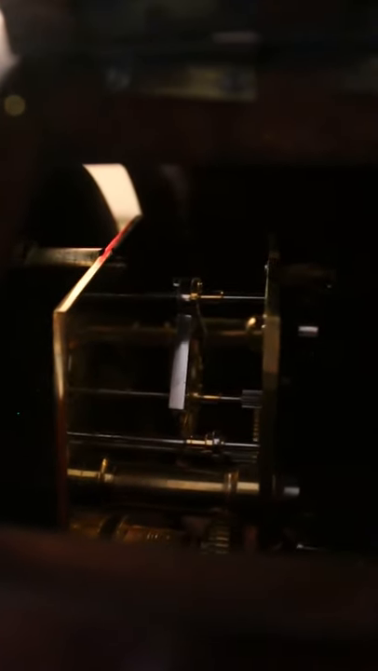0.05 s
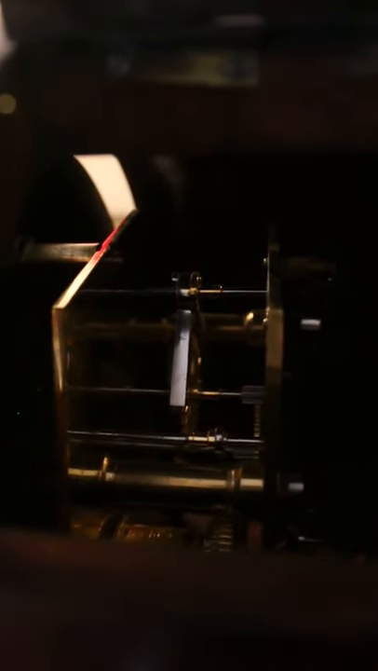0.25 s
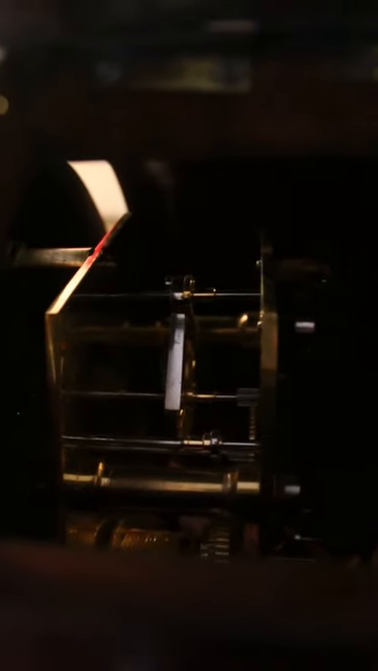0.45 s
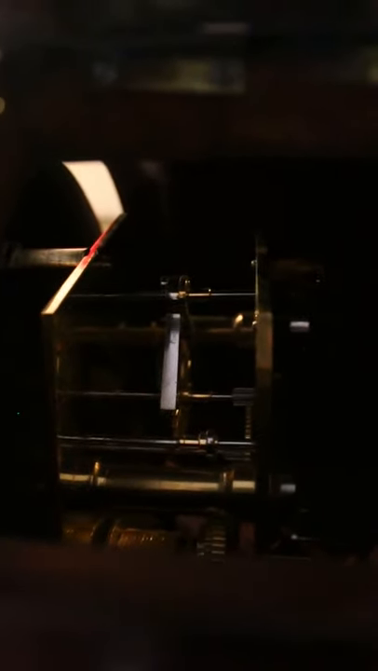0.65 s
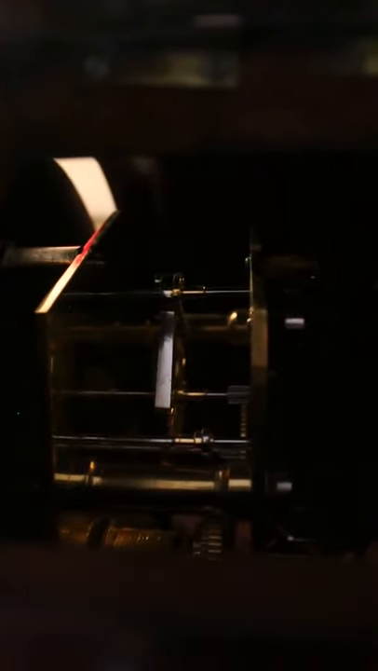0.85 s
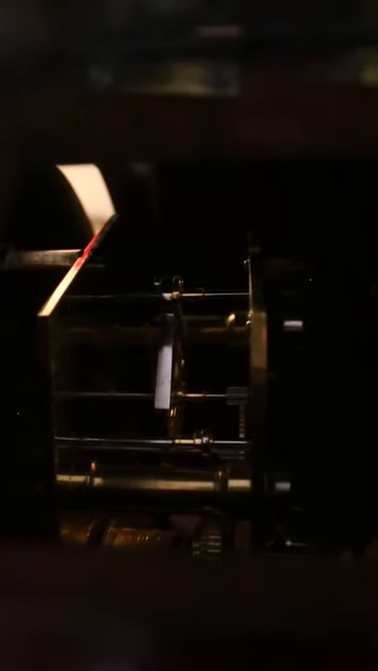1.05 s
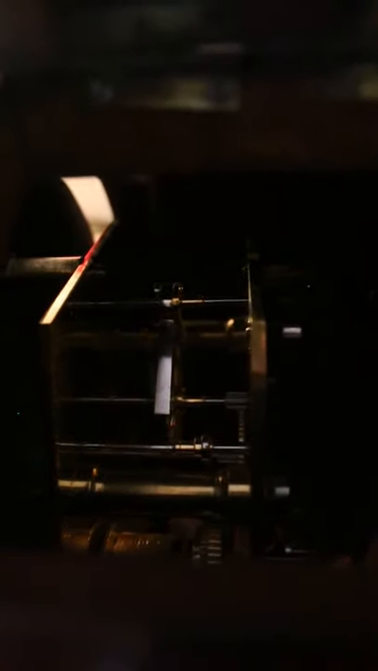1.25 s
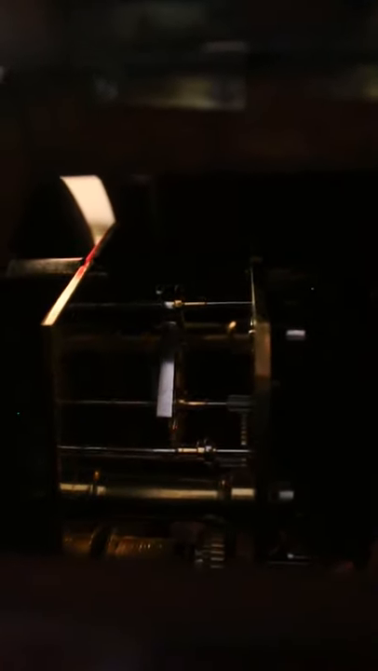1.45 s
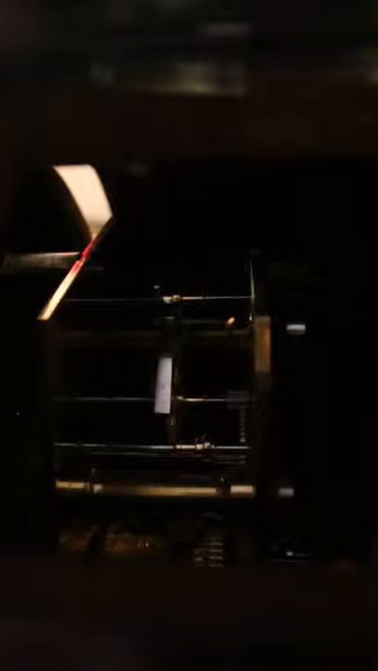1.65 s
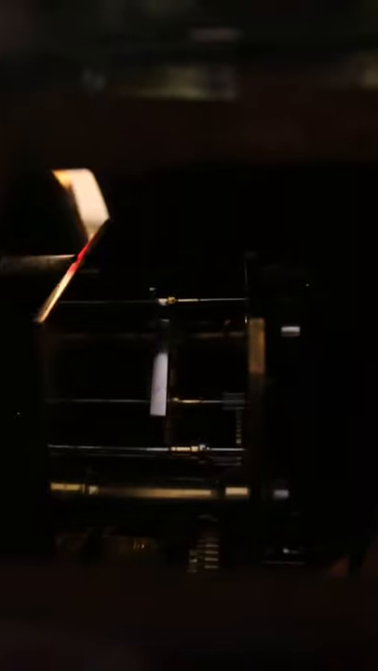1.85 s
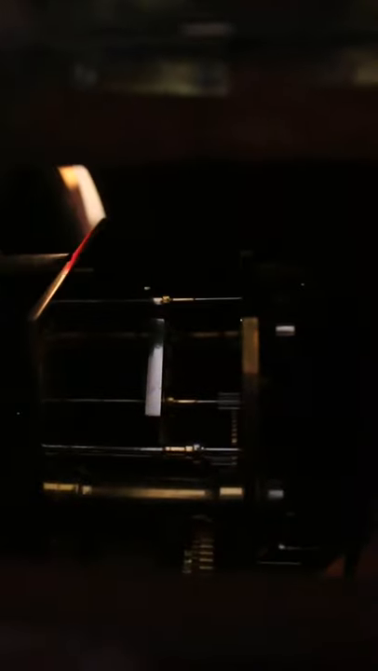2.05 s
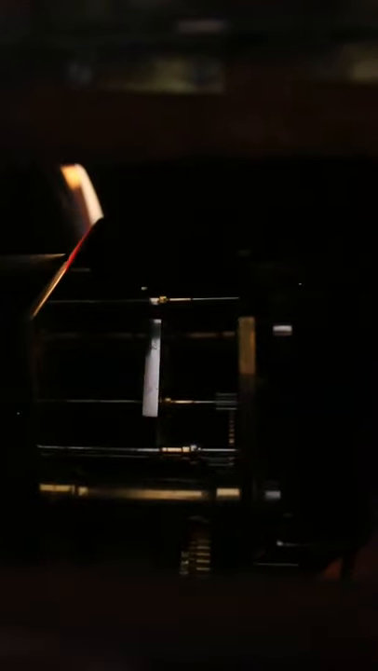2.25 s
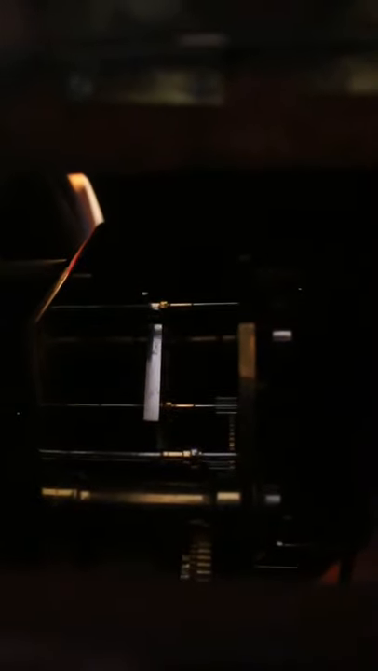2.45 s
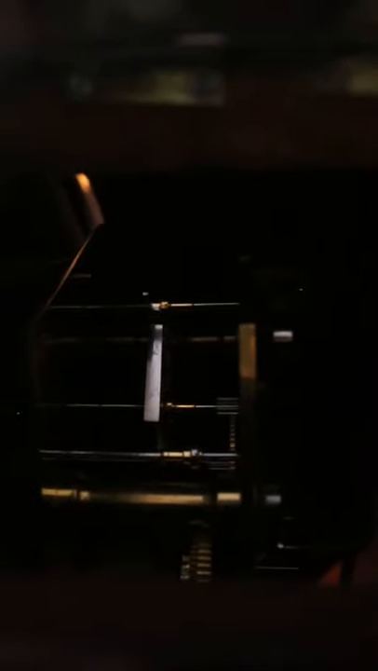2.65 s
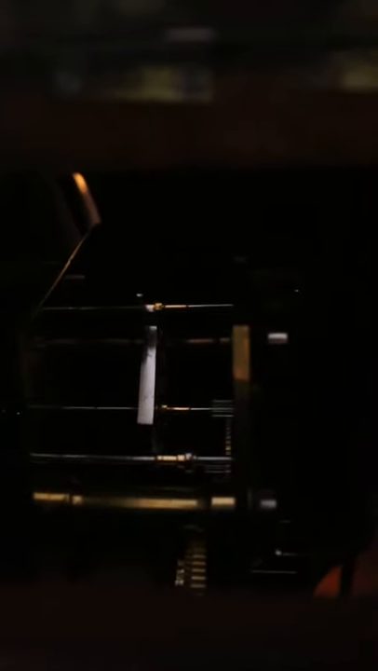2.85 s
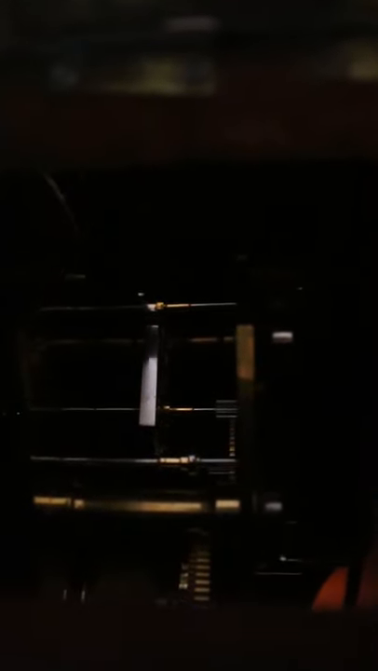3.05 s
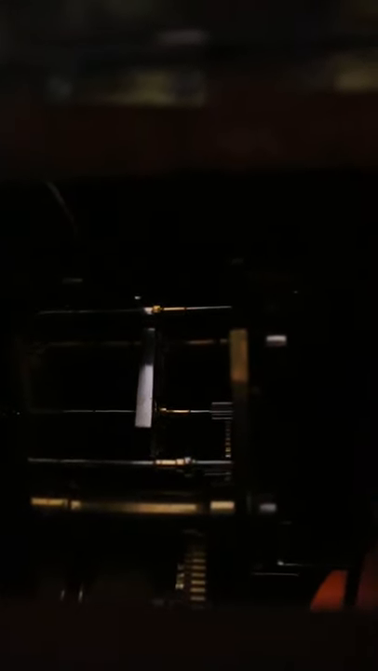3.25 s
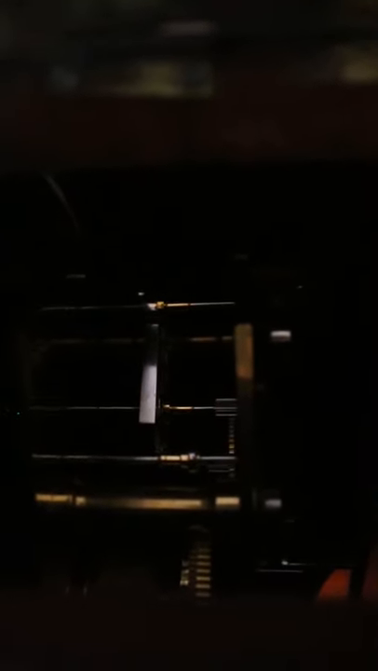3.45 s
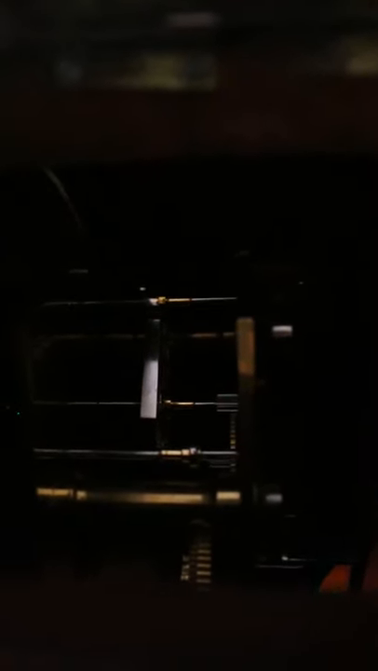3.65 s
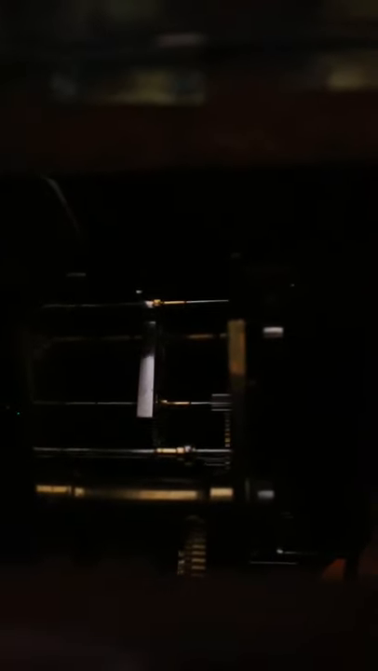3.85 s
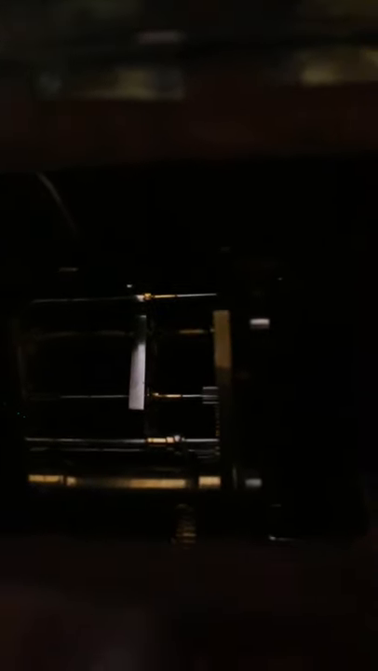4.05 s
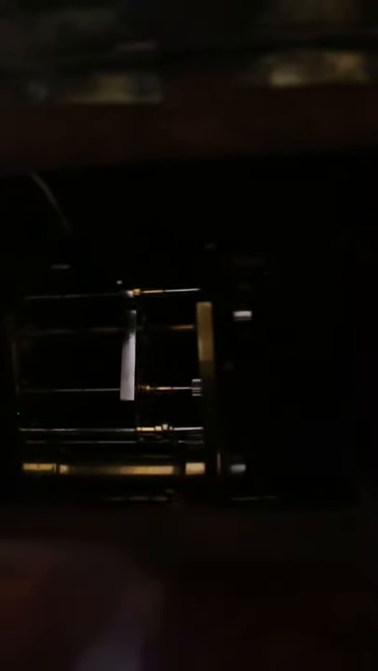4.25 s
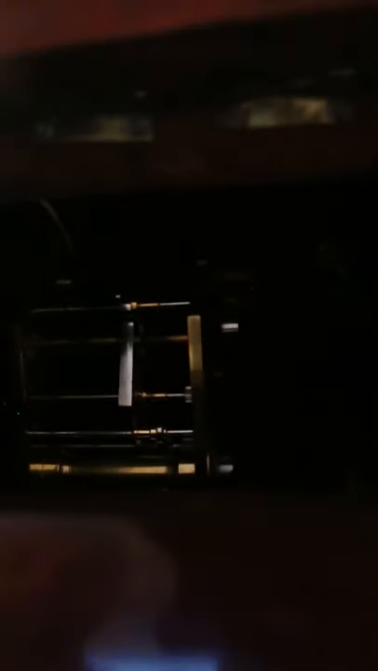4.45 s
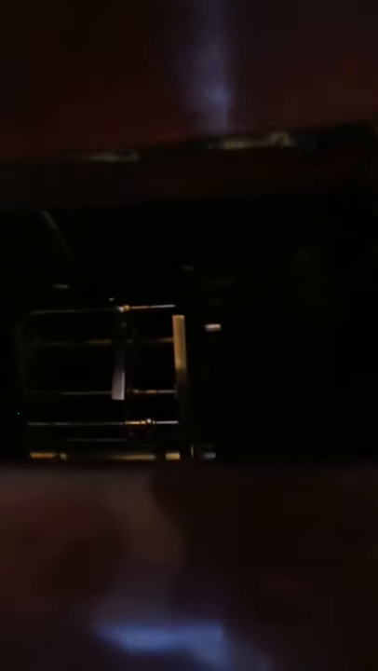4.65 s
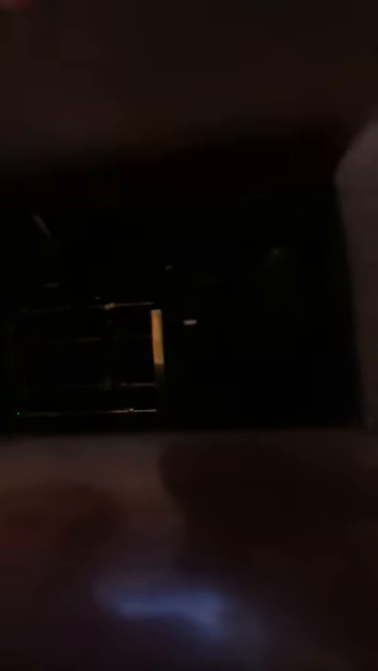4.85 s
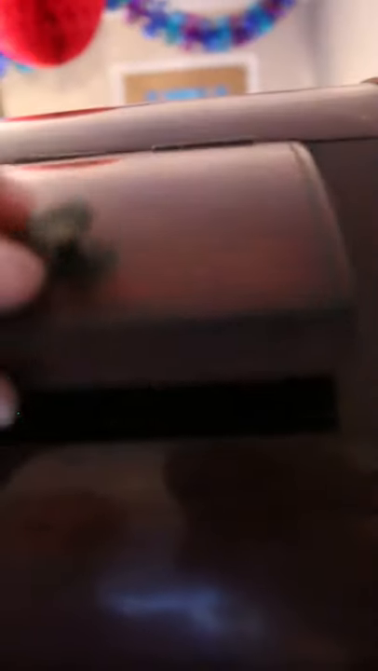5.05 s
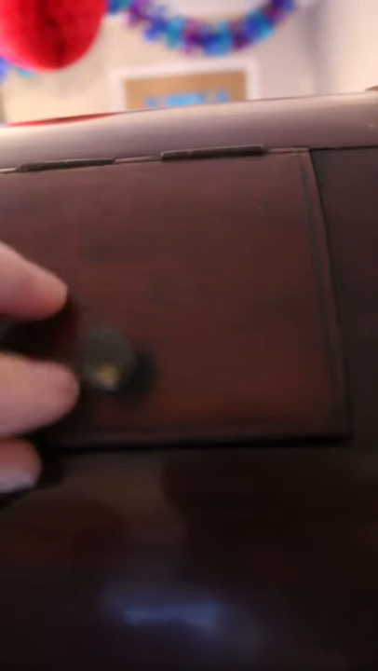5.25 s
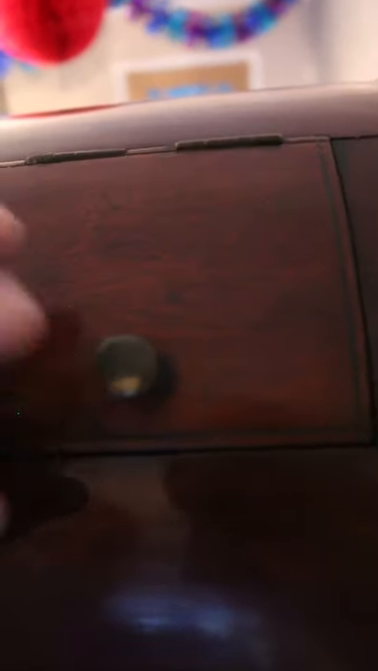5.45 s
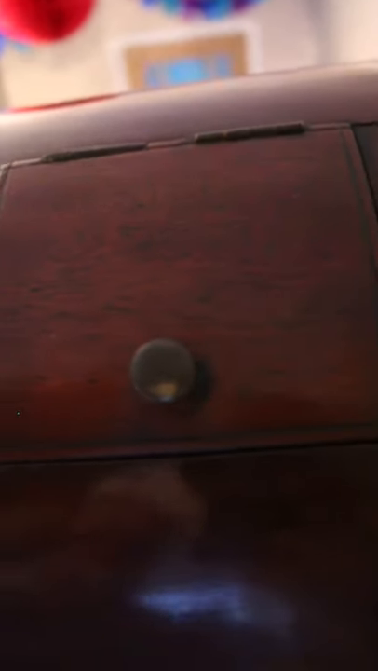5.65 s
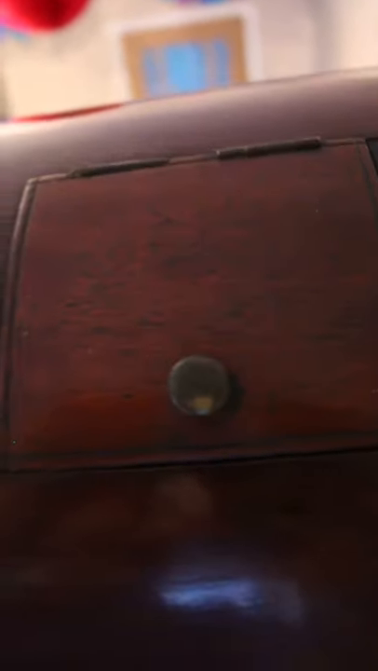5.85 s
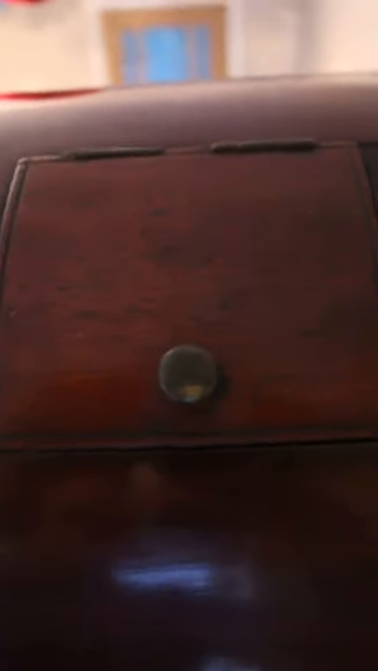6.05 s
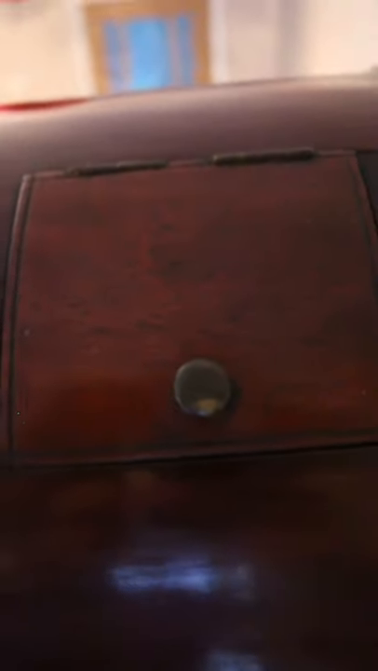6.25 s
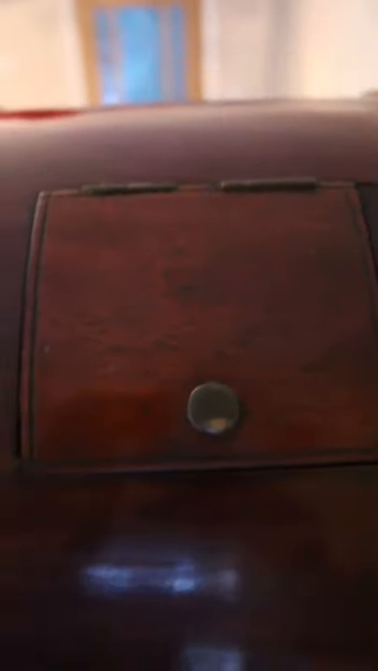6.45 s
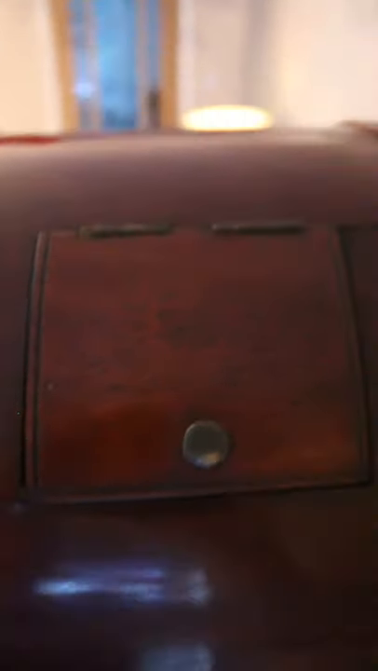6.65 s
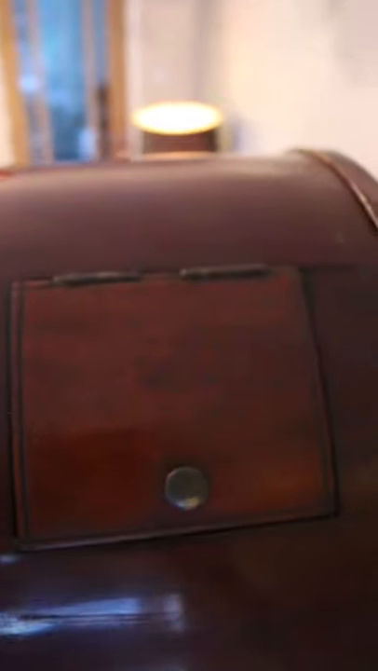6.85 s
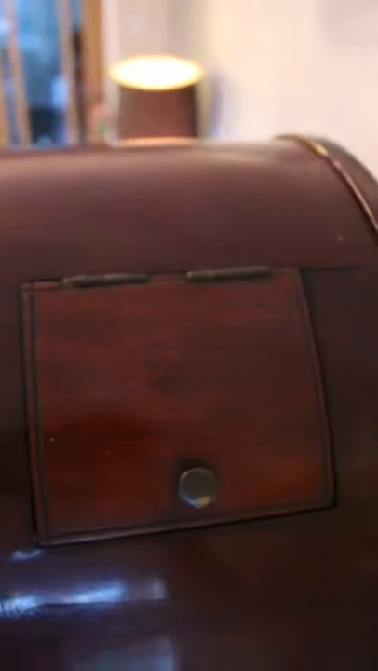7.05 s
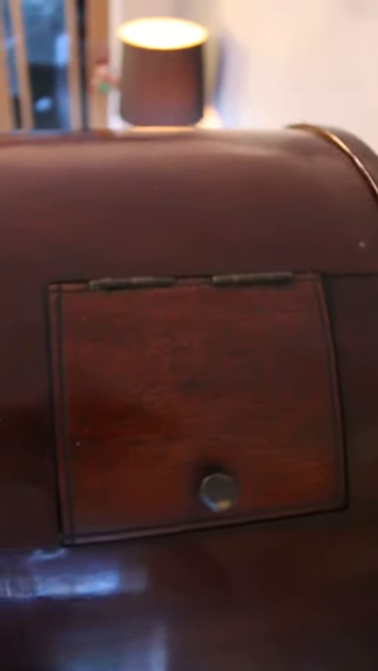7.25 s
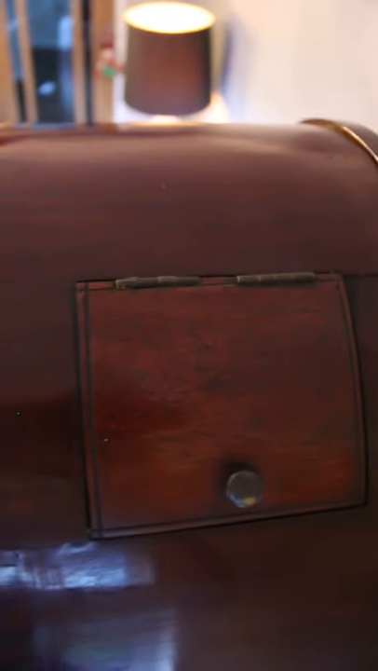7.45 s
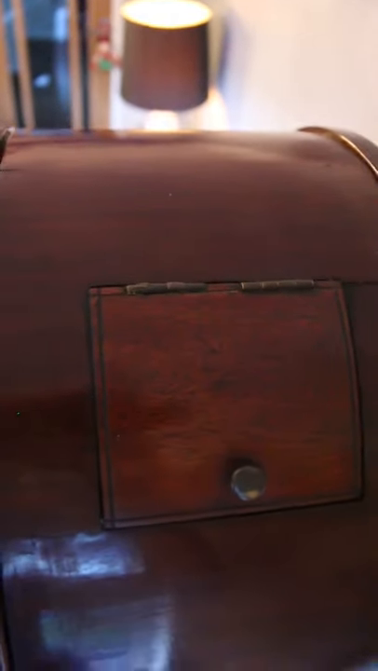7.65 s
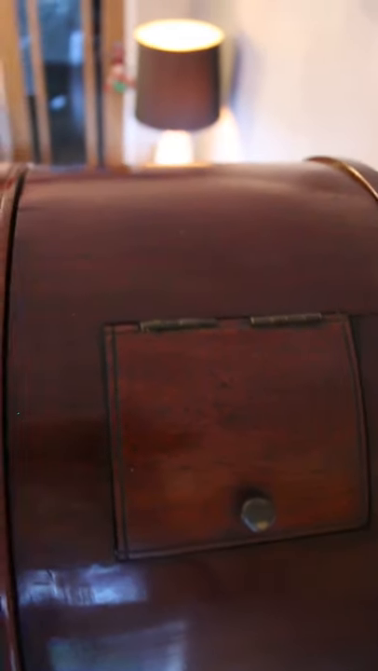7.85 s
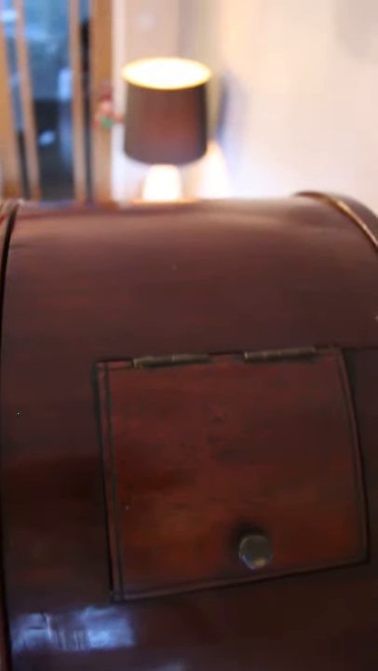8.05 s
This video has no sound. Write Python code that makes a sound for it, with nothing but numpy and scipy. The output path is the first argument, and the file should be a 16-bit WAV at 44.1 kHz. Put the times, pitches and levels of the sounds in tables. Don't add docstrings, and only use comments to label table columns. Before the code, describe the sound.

A quiet furnished room, heard in close stereo: low rumble, faint appliance hum and soft microphone hiss throughout. A pendulum clock in a wooden case beats roughly once a second, at 0.2, 1.2, 2.2, 3.2, 4.2 and 5.2 s, woody ticks and tocks with a short resonant ring. Faint hand rustling comes in the first second and near 2 s. Dull bumps at 2.7 and 3.0 s lead to a deep door thump further off at 3.13 s, booming and dying over about half a second. At 4.8 s a click and scuff; from 5.05 s a thin hinge squeak, then at 5.3 s a loud, hard wooden hatch slam with tight bounces. Small clicks follow at 5.45 and 6.23 s. Duller, muffled beats come at 6.2 and 7.2 s. Rubbing grows from 6.4 s, clicks cluster at 6.9 s, peaking in a sharp crack at 6.95 s, then dry creaks stutter from 7.05 s to the end.

```python
import sys
import numpy as np
from scipy import signal
from scipy.fft import rfft, irfft
from scipy.io import wavfile
from scipy.ndimage import uniform_filter1d

SR = 44100
rng = np.random.default_rng(int(sys.argv[2]) if len(sys.argv) > 2 else 0)


def natural_amplitude(level_db):
    exponent = np.asarray(level_db, float) / 20
    return 10 ** exponent


def unload_wav(signal):
    wavfile.write(
        sys.argv[1],
        SR,
        np.round(np.clip(np.atleast_2d(signal).T, -1, 1) * 32767).astype(np.int16),
    )


N = 357651
T = np.arange(N) / SR

# frequency in Hz, level in dB per Hz.
FLOOR_SPECTRUM = [(12, -51.5), (20, -12), (101, -13), (123, -1.5), (146, -11.5), (177, -7.5), (377, -13),
                  (698, -16), (1090, -16.5), (1190, -18.5), (6180, -25), (14300, -30.5), (16000, -36.5)]
# frequency in Hz, side minus mid in dB.
FLOOR_SIDE = [(60, -8.5), (110, -7.5), (200, -4), (380, -2), (700, -1.5), (1290, -0.5), (2380, 0.5),
              (4400, 0.5), (8120, 0.5), (15000, -0.5)]
# frequency in Hz, width in Hz, level in dB.
HUM_LINES = [(61.4, 4.1, -72), (96.2, 9.4, -64.5), (158.3, 12, -67), (1028, 18, -79.5)]
# frequency in Hz, decay by 60 dB in seconds.
ROOM_T60 = [(50, 1), (150, 0.5), (400, 0.45), (1500, 0.4), (4000, 0.32), (6500, 0.46), (10000, 0.2)]
# frequency in Hz, side minus mid in dB.
ROOM_SIDE = [(60, -38.5), (110, -29), (200, -10.5), (380, -17.5), (700, -12), (1290, -7.5), (2380, -1),
             (4400, 1), (8120, 3.5), (15000, -4)]

# peak in seconds, rise in seconds, fall in seconds, peak level in dB.
SHUFFLES = [(.02, 0.043, 0.069, -61.5), (.4, 0.14, 0.092, -59), (.55, 0.073, 0.12, -56.5),
            (.85, 0.079, 0.2, -63), (1.9, 0.15, 0.12, -60), (2.04, 0.045, 0.059, -59.5),
            (3.62, 0.05, 0.063, -59), (4.401, 0.043, 0.054, -60), (4.62, 0.05, 0.051, -59),
            (4.745, 0.012, 0.03, -51), (4.8, 0.015, 0.076, -47.5), (6.15, 0.025, 0.018, -62),
            (6.42, 0.11, 0.25, -59.5), (6.75, 0.047, 0.059, -48), (6.94, 0.025, 0.015, -50),
            (7.65, 0.093, 0.023, -59.5), (7.8, 0.015, 0.043, -61), (7.98, 0.022, 0.032, -65),
            (8.07, 0.026, 0.048, -62)]
SCRAPES = [(.01, .02, 0.087, -69), (.52, 0.12, .08, -60.5), (.668, 0.0082, 0.081, -56),
           (4.784, 0.003, 0.034, -47), (5.95, 0.036, 0.19, -66.5), (6.4, 0.065, .1, -56),
           (6.55, 0.09, 0.038, -52), (6.68, 0.0071, 0.087, -48), (6.96, .02, 0.011, -56),
           (7.1, 0.049, 0.046, -60), (7.62, 0.078, 0.054, -62), (7.85, 0.077, 0.08, -61)]
RUBS = [(.52, 0.059, .1, -62.5), (4.79, 0.012, 0.02, -57), (5.201, 0.17, 0.24, -59.5),
        (5.95, 0.039, .15, -66), (6.45, 0.055, 0.083, -58.5), (6.55, 0.074, 0.039, -48.5),
        (6.76, .08, 0.42, -61.5), (6.94, 0.043, .01, -72), (6.952, 0.0034, 0.016, -47),
        (7.11, 0.052, 0.043, -58.5), (7.63, 0.23, 0.028, -60), (7.81, 0.089, 0.2, -59.5)]
WISPS = [
    (4.79, .01, 0.019, -57.5),
    (5.15, 0.062, 0.054, -72),
    (6.42, 0.056, .1, -60.5),
    (6.54, .04, .025, -56.5),
    (6.953, .003, .02, -72),
]
# centre in Hz, spread in octaves.
HAND_BANDS = [(330, 0.68), (950, 0.71), (2900, 0.92), (9000, 0.63)]
# start in seconds, end in seconds, frequency in Hz, width in Hz, level in dB.
SQUEALS = [(5.045, 5.31, 2950, 100, -70), (5.06, 5.27, 3620, 90, -67.5), (5.15, 5.32, 5540, 50, -70),
           (5.898, 6.37, 12800, 80, -77.5), (1.992, 2.107, 250, 50, -55), (1.976, 2.12, 152, 25, -59),
           (7.63, 7.695, 900, 250, -55), (7.64, 7.69, 650, 120, -57), (6.525, 6.568, 2200, 1500, -54),
           (.661, .7, 1000, 220, -59), (7.728, 7.882, 2600, 700, -59), (7.725, 7.86, 3450, 1100, -59.5)]
# start in seconds, peak level in dB, brightness in dB (upper modes).
SLIPS = [(7.053, -46.5, 4), (7.069, -48, 1), (7.083, -51, -1), (7.0936, -43, 0), (7.105, -44, 3),
         (7.116, -57, 11), (7.1255, -55, 0), (7.1414, -47, 4), (7.2759, -33.5, -1), (7.286, -42.5, 7),
         (7.2966, -40, 1), (7.3057, -42, 1), (7.3137, -40, 2), (7.3205, -38, -1), (7.3282, -39, 1),
         (7.3351, -38.5, -4), (7.3426, -37, 2), (7.3497, -42, 1), (7.3598, -40, 0), (7.4083, -40.5, 6.5),
         (7.4173, -40.5, 1), (7.426, -44.5, 6), (7.434, -42, 0), (7.44, -40.5, -3), (7.4464, -40, -4),
         (7.49, -39, -3), (7.4984, -36, -3), (7.5074, -37, -3), (7.518, -39.5, -1), (7.5296, -37.5, 0),
         (7.5404, -40, 1), (7.5502, -39, -3), (7.561, -38.5, -5), (7.5692, -36, -4), (7.5777, -36, -1),
         (7.5852, -40, -2), (7.5921, -37, -3), (7.599, -38, -4), (7.6058, -38.5, 2), (7.6141, -35, -7),
         (7.6227, -40, -2), (7.7919, -38, -7), (7.8017, -39, -5), (7.8182, -42, -12), (7.958, -37.5, -3),
         (7.9698, -38.5, -6), (7.9847, -40.5, -5), (7.9973, -35.5, -7), (8.0081, -36, -8), (8.058, -34, -5),
         (8.066, -54, -7), (8.0783, -36.5, -6)]
# frequency in Hz, width in Hz, level in dB, left minus right in dB, left delay in ms.
GRIP_MODES = [(167, 84, -13, -1.5, -0.063), (660, 135, -10, -1, .02), (1050, 269, -9, 5, -0.18),
              (1456, 175.4, -5, 1.5, -0.72), (2054, 194.5, -1.5, -1.5, 0.445), (2390, 252, -3, -3.5, -0.28),
              (2850, 374, -11.5, 15, 0.07), (3500, 325, -4, -9, -0.19), (4000, 375, -8, -4, -0.091),
              (4850, 513, -15, 4, 0.0043), (5870, 720, -10, 0, -0.0046), (8050, 1300, -10.5, -6, 0.063)]
# start in seconds, peak level in dB, centre in Hz, width in octaves, left delay in ms.
CLICKS = [(0.665, -50, 1000, 0.72, .03), (4.7847, -29, 2800, 1.1, -0.031), (5.4523, -31.5, 4300, .5, 0.053),
          (5.456, -34.5, 6470, 0.76, 0.013), (6.2338, -33, 3350, 0.71, 0.037),
          (6.2377, -32, 5000, 0.8, 0.1), (6.684, -43, 1200, 0.66, .03), (6.804, -44, 3000, 0.5, 0.066),
          (6.819, -40.5, 480, 0.66, 0.16), (6.843, -44, 3500, 0.38, 0.1), (6.902, -23, 2530, 1, 0.094),
          (6.915, -22, 2300, 1.5, 0.18), (6.9212, -21.5, 2000, 0.94, 0.065),
          (6.9477, -8.5, 5000, 2.2, 0.043), (7.272, -33, 3500, 0.4, 0.11), (7.278, -31, 2500, 0.59, 0.12),
          (7.845, -53, 950, 0.27, .03), (7.862, -51, 1000, .3, 0.008), (7.892, -29, 4320, 0.79, 0.041)]
# frequency in Hz, level in dB, decay by 60 dB in seconds.
SHELL_MODES = [(1000, -10, 0.023), (2620, -18, 0.029), (1820, -26, 0.035), (735, -17.5, 0.022),
               (3730, -29, .012)]

# start in seconds, peak level in dB, brightness in dB per octave.
SLAM = [
    (5.3107, 1, -0.5),
    (5.3152, -11.5, 2.5),
    (5.3225, -14.5, -3),
]
# frequency in Hz, level in dB, decay by 60 dB in seconds.
HATCH_MODES = [(103.7, -25.5, 0.41), (145, 4, 0.014), (147, -17.5, 0.67), (290, -8, 0.072),
               (526, 6.5, 0.042), (687, -18, 0.017), (1010, -15.5, 0.05), (1238, -1, 0.036),
               (1590, -6, 0.042), (2990, -8.5, 0.027), (4930, -13.5, 0.012), (9900, -36.5, 0.023)]
# frequency in Hz, level in dB per Hz.
HATCH_SPECTRUM = [(24, -62.5), (40, -35.5), (135, -5.5), (211, -43), (270, -1.5), (490, 5.5), (980, 4.5),
                  (1080, -20), (1200, 3), (2710, -20), (2990, -7), (3830, -28.5), (15000, -55.5)]
HATCH_ECHO = [(24, -64.5), (40, -34.5), (92, -7.5), (257, -14.5), (283, -3.5), (608, -4), (790, 1),
              (934, -7.5), (1270, -6), (1430, -12.5), (1910, -13), (2540, -24.5), (3600, -33), (5500, -46),
              (7000, -53.5), (12000, -63.5), (15600, -96), (22000, -120)]

# start in seconds, peak level in dB, brightness in dB per octave, push length in seconds.
BUMPS = [
    (2.7195, -35, -5, .012),
    (2.7285, -18.5, -2.5, 0.012),
    (2.765, -25.5, -5.5, 0.018),
    (3.012, -28, 1, 0.014),
    (3.0175, -28.5, 4.5, 0.014),
    (3.056, -24.5, 3, 0.012),
]
DOOR_HITS = [
    (3.101, -21, 3.5, 0.0081),
    (3.107, -19, 6.5, .008),
    (3.122, -8.5, 6, 0.0081),
    (3.1355, -4.5, -1, 0.0039),
]
# frequency in Hz, level in dB, decay by 60 dB in seconds.
BUMP_MODES = [(93.5, -8, 0.76), (122, -1.5, 0.29), (150.4, -1.5, 0.48), (208.4, -17, 0.5), (261, -3.5, 0.3),
              (297.5, 4.5, 0.15), (393.7, -8.5, 0.36), (646, -16.5, 0.39), (877, -29, 0.23),
              (962, -22, 0.4)]
DOOR_MODES = [(90.7, -17, 0.55), (122, 0, 0.61), (139.5, -4, 0.47), (201.6, -10.5, 0.72), (226, 10, 0.072),
              (263.5, -14, 0.15), (289, 4, 0.4), (436, -12.5, 0.58), (532.6, -7, .3), (605, -5.5, 0.33),
              (732, -1, 0.12), (841, -5, 0.34), (992.5, -1.5, 0.2)]
# frequency in Hz, level in dB per Hz.
BUMP_SPECTRUM = [(15, -70), (25, -33), (127, -3), (300, -7.5), (480, -21), (614, -13), (911, -25),
                 (1010, -19.5), (1110, -24), (3990, -38), (9000, -76), (11700, -95), (19800, -120)]
DOOR_SPECTRUM = [(20, -43), (45, -14), (100, -7), (200, -3.5), (290, -1.5), (500, -21.5), (1000, -15.5),
                 (2000, -34), (3200, -38), (5000, -51.5), (7500, -69), (10000, -79), (15000, -85.5)]
DOOR_ECHO = [(24, -33.5), (40, -17.5), (92, -9), (142, -7.5), (172, -21.5), (240, -25), (283, -15),
             (386, -32), (539, -5.5), (685, -12.5), (1030, -17.5), (1580, -19), (3000, -28.5),
             (5080, -37.5), (7500, -53), (12000, -66), (15600, -101), (22000, -120)]

# start in seconds, peak level in dB, brightness in dB per octave.
TICKS = [
    (.192, -31, 3),
    (2.196, -31.5, 0.5),
    (4.1985, -30.5, 0.5),
]
TOCKS = [
    (1.218, -31, 0.22),
    (3.21, -28, 0.4),
    (5.216, -35, -.3),
]
SHUT_TICKS = [
    (6.203, -35, -3.5),
]
SHUT_TOCKS = [
    (7.2117, -35.5, -4.5),
]
# frequency in Hz, level in dB, decay by 60 dB in seconds.
TICK_MODES = [(293, 3, 0.65), (365, -32, 0.25), (432, 4.5, 0.5), (545, 5, 0.37), (788, -2, 0.23),
              (1036, 11, 0.2), (1154, 16.5, 0.047), (1834, -1, 0.12), (2179, -6.5, 0.42), (3010, -6, 0.11),
              (5680, -24, 0.27)]
TOCK_MODES = [(289, -8, 0.34), (409, 4, 0.12), (463.5, 4.5, 0.3), (573, -2.5, 0.35), (728, -2, 0.23),
              (978, -1, 0.2), (1406, -15.5, 0.43), (2190, -13, 0.41), (1950, -17, 0.1), (2830, -27, .15),
              (5700, -38, .25)]
SHUT_TICK_MODES = [(466, -2.5, 0.41), (497, -9, 0.59), (1040, -14, 1), (1097, 11.5, 0.06), (2150, -26, .2)]
SHUT_TOCK_MODES = [(445, -7, 0.68), (523, 0.5, 0.43), (722, -5, 0.32), (1000, -6, .25), (1284, -16, 0.69),
                   (2180, -8.5, 0.51)]
# frequency in Hz, level in dB per Hz.
CASE_SPECTRUM = [(88, -67.5), (150, -50.5), (366, -14), (449, -5), (876, -8.5), (1040, -5), (1520, -14.5),
                 (2210, -14), (2620, -19.5), (9000, -39), (11700, -69.5), (19800, -120)]


def on_log(table, hz):
    at, value = np.transpose(table)
    return np.interp(np.log(hz + 1), np.log(at), value)


def unit(x):
    return x / np.sqrt(np.mean(x ** 2))


def shape(x, gain):
    size = x.shape[-1]
    return irfft(rfft(x) * gain(np.arange(size // 2 + 1) * SR / size), size)


def bell(hz, octaves):
    return lambda f: np.exp(-.5 * (np.log2((f + 1) / hz) / octaves) ** 2)


def causal(gain, size=4096):
    cepstrum = irfft(np.log(gain(np.arange(size // 2 + 1) * SR / size) + 1e-9))
    cepstrum[1:size // 2] *= 2
    cepstrum[size // 2 + 1:] = 0
    return irfft(np.exp(rfft(cepstrum)))


def pair(size, side):
    mid, diff = rng.standard_normal((2, size))
    diff = shape(diff, lambda f: natural_amplitude(on_log(side, f)))
    return np.array([mid + diff, mid - diff])


def narrow(hz, width):
    return unit(shape(rng.standard_normal(N), lambda f: 1 / (1 + ((f - hz) / width * 2) ** 4)))


def room(rise_s, wet_db, dull_db):
    t = T[:SR]
    echoes = shape(pair(SR, ROOM_SIDE), lambda f: natural_amplitude(-dull_db * np.log2(f / 1000 + 1)))
    tail = 0
    for hz in 30 * 2 ** np.arange(0, 9.5, .5):
        tail = tail + shape(echoes, bell(hz, 1 / 4)) * 1000. ** (-t / on_log(ROOM_T60, hz))
    tail *= natural_amplitude(wet_db) * (1 - np.exp(-t / rise_s)) / np.sqrt(SR)
    tail[:, 0] = 1
    return tail


def echo(space, spectrum):
    colour = causal(lambda f: natural_amplitude(on_log(spectrum, f)))
    wet = signal.fftconvolve(space[:, 1:], colour[None], axes=1)
    return wet / np.abs(wet).max()


def blow(modes, spectrum, space, push_s, tilt_db, ring_db, cycles, ease=1):
    def tilt(f):
        return natural_amplitude(tilt_db * np.log2(f / 300 + 1))

    t = T[:SR]
    push_t = t[:SR // 4]
    envelope = np.exp(-push_t / push_s) * (1 - np.exp(-push_t / (1.3 * push_s)))
    push = rng.standard_normal(SR // 4) * envelope
    rattle = signal.fftconvolve(push, causal(lambda f: natural_amplitude(on_log(spectrum, f)) * tilt(f)))
    rattle = signal.fftconvolve(np.pad(rattle, (0, SR))[None], space, axes=1)[:, :SR]
    ring = 0
    for (hz, db, t60), (off, turn) in zip(modes, rng.uniform(-1.37, 1, (len(modes), 2))):
        wave = np.sin(2 * np.pi * hz * t)
        twin = np.sin(2 * np.pi * hz * (1 + 0.024 * off) * t + np.pi * turn)
        swell = (1 - np.exp(-t * hz / cycles)) ** ease
        ring = ring + natural_amplitude(db) * tilt(hz) * (wave + 0.49 * twin) * swell * 1000. ** (-t / t60)
    out = unit(rattle) + natural_amplitude(ring_db) * unit(ring)
    return out / np.abs(out.mean(axis=0)).max()


def add(bus, s, sound):
    i = int(s * SR)
    bus[:, i:i + sound.shape[1]] += sound[:, :N - i]


def floor():
    noise = shape(pair(N, FLOOR_SIDE), lambda f: natural_amplitude(on_log(FLOOR_SPECTRUM, f)))
    noise *= natural_amplitude(-60) / np.sqrt(np.mean(noise.mean(axis=0) ** 2))
    return noise + sum(natural_amplitude(db) * narrow(hz, width) for hz, width, db in HUM_LINES)


def hand():
    out = np.zeros((2, N))
    for strokes, (hz, octaves) in zip((SHUFFLES, SCRAPES, RUBS, WISPS), HAND_BANDS):
        roughness = uniform_filter1d(rng.standard_normal(N), int(3 * SR / hz + 60))
        grain = natural_amplitude(2.0 * unit(roughness))
        noise = unit(shape(grain * pair(N, ROOM_SIDE), bell(hz, octaves)))
        power = 0
        for s, rise, fall, db in strokes:
            away = np.where(T < s, (s - T) / rise, (T - s) / fall)
            power = power + natural_amplitude(2 * db) * np.exp(-2 * away)
        out += np.sqrt(power) * noise
    return out


def squeals():
    out = 0
    for start, end, hz, width, db in SQUEALS:
        arch = np.abs(np.sin(np.pi * np.clip((T - start) / (end - start), 0, 1)))
        out = out + natural_amplitude(db) * arch ** 0.39 * narrow(hz, width)
    return out


def creaks():
    dry, t = np.zeros((2, N)), T[:512]
    slip_gain_db, scatter_db, detune, swell_lag = -2, 1.2, .02, 2.32
    hz, width, db, pan_db, late_ms = np.transpose(GRIP_MODES)[:, :, None]
    spread = 1 / (2 * np.pi * width)
    chances = rng.standard_normal((len(SLIPS), 2, len(GRIP_MODES), 1))
    for (s, slip_db, bright_db), (gain_chance, pitch_chance) in zip(SLIPS, chances):
        gain = natural_amplitude(slip_db + slip_gain_db + db + bright_db * (hz > 2800) + scatter_db * gain_chance)
        ears = []
        for side in (1, -1):
            u = t - side * late_ms / 2000 - swell_lag * spread
            swell = np.exp(-.5 * (u / spread) ** 2)
            wave = np.sin(2 * np.pi * hz * (1 + detune * pitch_chance) * u)
            ears.append((gain * natural_amplitude(side * pan_db / 2) * swell * wave).sum(axis=0))
        add(dry, s, np.array(ears))
    return signal.fftconvolve(dry, room(rise_s=0.00089, wet_db=2.5, dull_db=0.0), axes=1)[:, :N]


def clicks(bus):
    t, space = T[:2048], room(rise_s=0.00059, wet_db=5.5, dull_db=3.5)
    crack_s, shade_db = 0.001, 2.5
    scatter_db, detune = 3., .04
    ring_hz, ring_db, t60 = np.transpose(SHELL_MODES)[:, :, None]
    for s, db, hz, octaves, late_ms in CLICKS:
        gain, off = rng.standard_normal((2, len(SHELL_MODES), 1))
        wave = np.sin(2 * np.pi * ring_hz * (1 + detune * off) * t)
        ring = natural_amplitude(ring_db + scatter_db * gain) * wave * 1000. ** (-t / t60)
        impulse = 4.6 * (t[:1024] == 0)
        crack = (rng.standard_normal(1024) + impulse) * np.exp(-t[:1024] / crack_s)
        source = np.pad(crack, (0, 1024)) + ring.sum(axis=0)
        right = signal.fftconvolve(source, causal(bell(hz, octaves)))

        def path(f):
            delay = np.exp(-2j * np.pi * f * late_ms / 1000)
            return natural_amplitude(-shade_db * np.log2(f / 2500 + 0.18)) * delay

        click = natural_amplitude(db) * np.array([shape(right, path), right]) / np.abs(right).max()
        add(bus, s, signal.fftconvolve(click, space, axes=1))


def hatch(bus):
    direct = np.ones((2, 1))
    for s, db, tilt_db in SLAM:
        hit = blow(HATCH_MODES, HATCH_SPECTRUM, direct, 0.0027, tilt_db, ring_db=-10.0, cycles=0.74)
        add(bus, s, natural_amplitude(db) * hit)
    answer = echo(room(rise_s=0.025, wet_db=0, dull_db=-1), HATCH_ECHO)
    add(bus, SLAM[0][0], natural_amplitude(-9.0) * answer)


def door(bus):
    space = room(rise_s=0.00078, wet_db=9.5, dull_db=-0.5)
    bumps = (BUMPS, BUMP_MODES, BUMP_SPECTRUM, 0.5)
    landing = (DOOR_HITS, DOOR_MODES, DOOR_SPECTRUM, -2.5)
    for hits, modes, spectrum, ring_db in (bumps, landing):
        for s, db, tilt_db, push_s in hits:
            add(bus, s, natural_amplitude(db) * blow(modes, spectrum, space, push_s, tilt_db, ring_db, cycles=3.5))
    add(bus, 3.134, natural_amplitude(-12.5) * echo(space, DOOR_ECHO))


def clock(bus):
    space = room(rise_s=0.0044, wet_db=30.5, dull_db=8.0)
    for beats, modes in ((TICKS, TICK_MODES), (TOCKS, TOCK_MODES),
                         (SHUT_TICKS, SHUT_TICK_MODES), (SHUT_TOCKS, SHUT_TOCK_MODES)):
        for s, db, tilt_db in beats:
            beat = blow(modes, CASE_SPECTRUM, space, 0.013, tilt_db, ring_db=3, cycles=3.2, ease=2.4)
            add(bus, s, natural_amplitude(db) * beat)


def scene():
    bus = floor() + hand() + squeals() + creaks()
    for source in (clicks, hatch, door, clock):
        source(bus)
    return bus


def band_limit(x):
    return signal.sosfilt(signal.butter(12, 15800, fs=SR, output="sos"), x)


def record(dry):
    headroom, top_hz = 1.1, 15900
    rounded = headroom * np.tanh(dry / headroom)
    low_pass = signal.ellip(6, .2, 60, top_hz, fs=SR, output="sos")
    return band_limit(signal.sosfilt(low_pass, rounded))


dry = scene()
out = record(dry)
unload_wav(out)
```